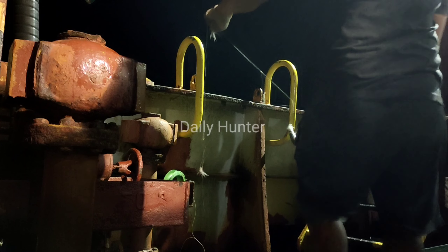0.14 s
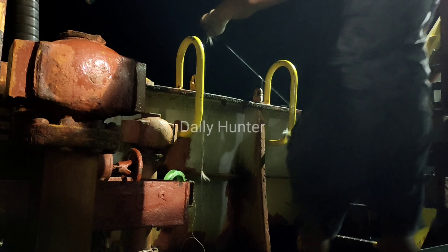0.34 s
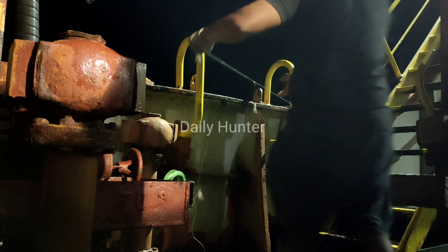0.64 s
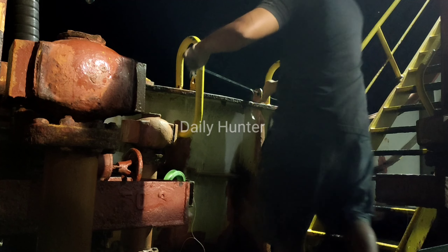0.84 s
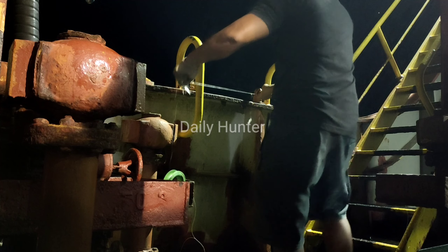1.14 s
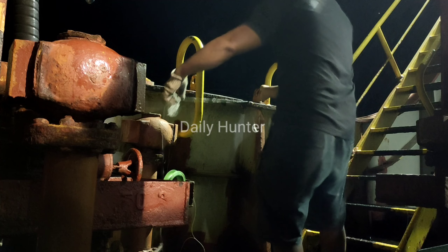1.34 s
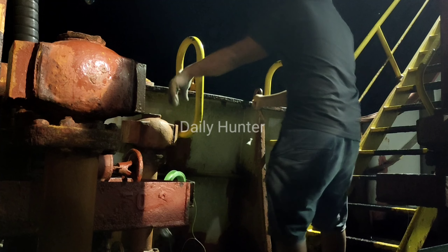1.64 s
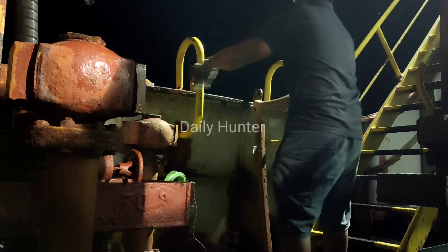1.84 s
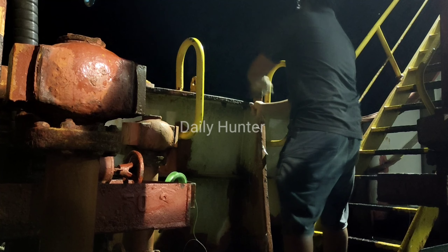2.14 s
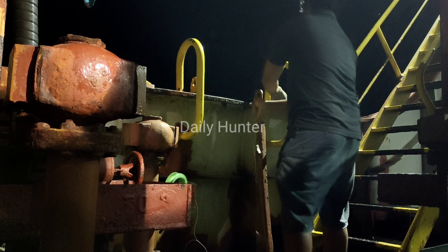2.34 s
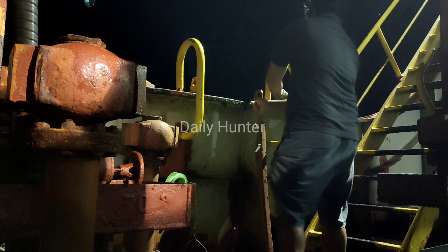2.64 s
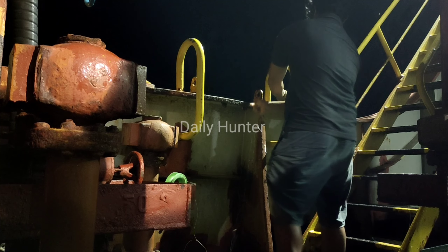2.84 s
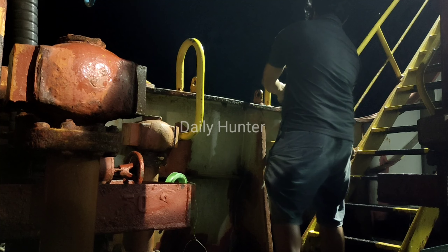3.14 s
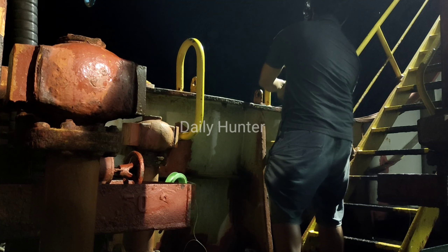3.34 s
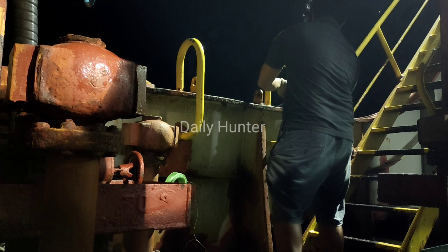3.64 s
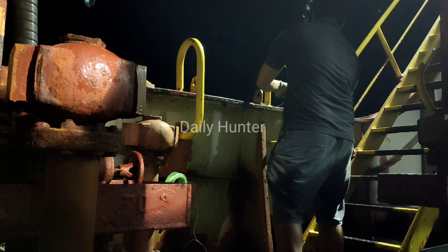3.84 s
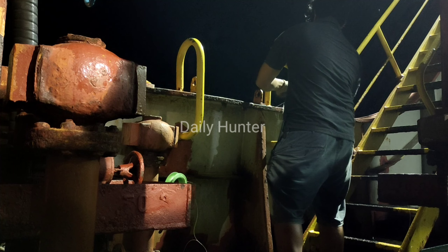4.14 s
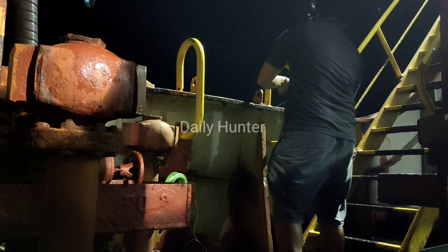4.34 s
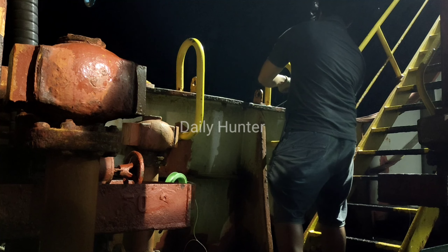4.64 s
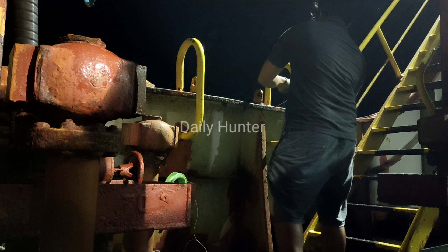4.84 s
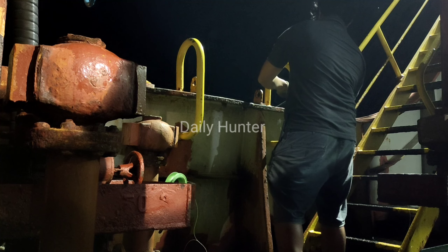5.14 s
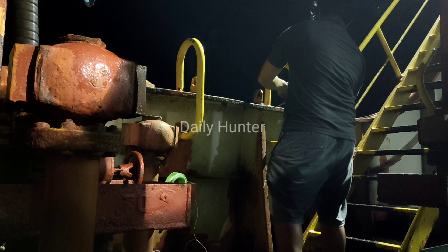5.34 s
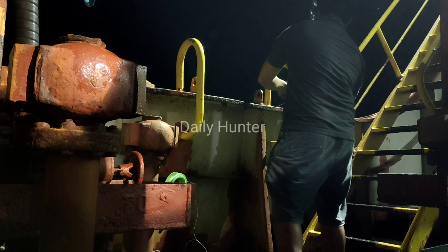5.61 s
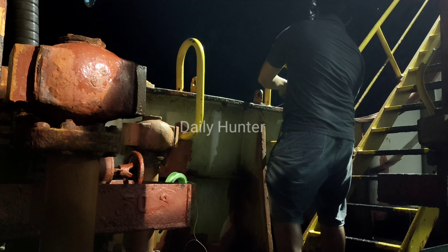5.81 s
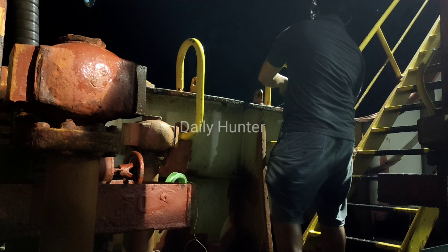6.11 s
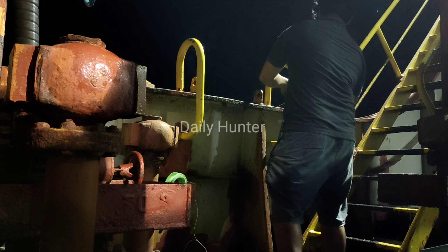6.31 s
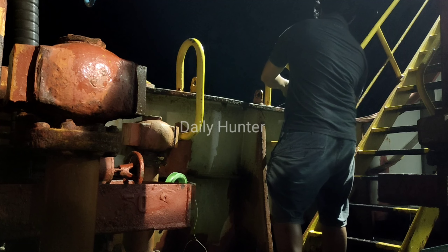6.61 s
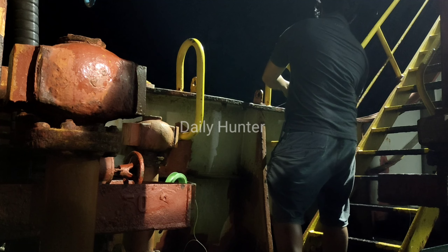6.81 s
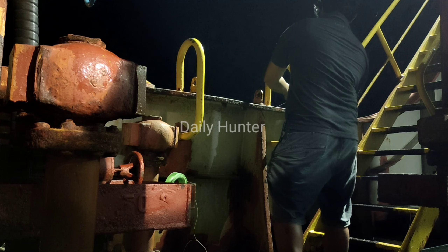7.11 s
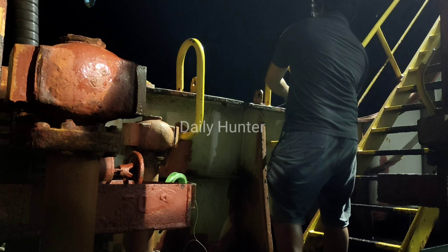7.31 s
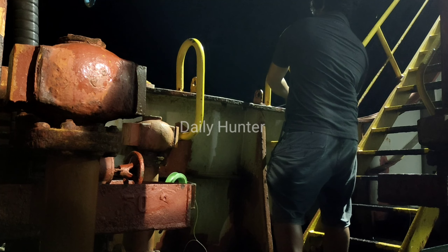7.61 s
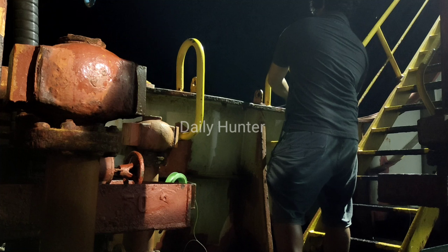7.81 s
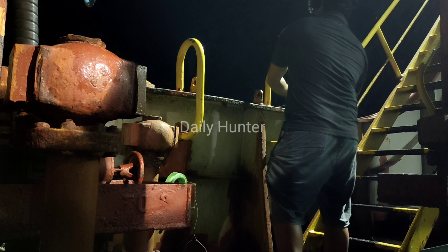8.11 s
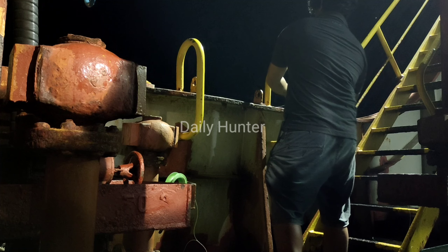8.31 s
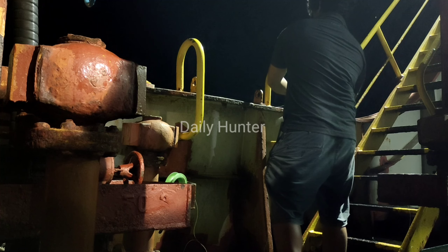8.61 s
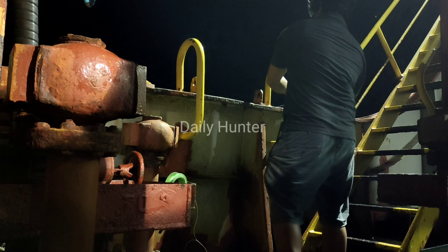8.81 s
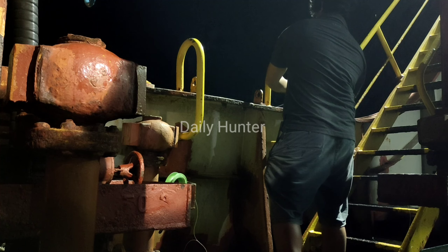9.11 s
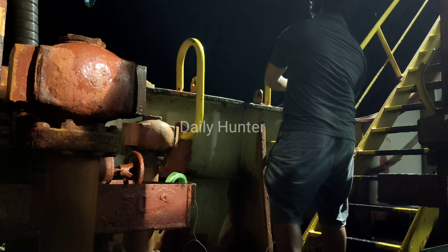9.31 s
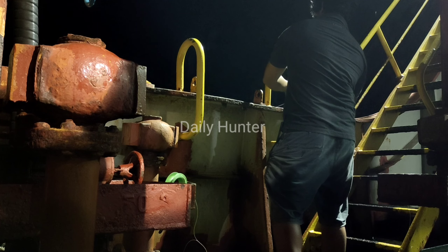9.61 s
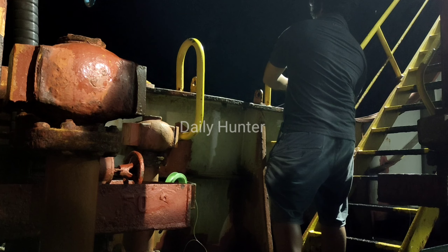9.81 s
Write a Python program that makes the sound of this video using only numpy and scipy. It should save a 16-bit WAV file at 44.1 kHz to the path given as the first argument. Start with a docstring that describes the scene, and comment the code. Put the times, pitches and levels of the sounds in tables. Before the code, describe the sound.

A loud, deep ship-engine hum throbs continuously, with resonant steelwork rumble, rushing exhaust and ventilation noise, and a very faint duct whistle.

```python
"""Two diesel exhausts drone on a ship's open steel deck at night: tones on multiples of two unrelated
crank speeds, beating against each other. The second engine's tone dips twice.
Beneath: noise ringing in steelwork and duct resonances, and a broad roar with a thin hiss on top, both
pulsing gently with the main engine. Drone and machinery start 2 dB low and settle.
A faint duct whistle, narrow-band noise, swells three times."""
import sys
import numpy as np
from scipy import signal
from scipy.fft import rfft, irfft, next_fast_len
from scipy.io import wavfile

SR = 44100
rng = np.random.default_rng(int(sys.argv[2]) if len(sys.argv) > 2 else 0)


def wav_out(sig):
    """Save sig, one row per channel (or a flat mono array), as 16-bit PCM at SR to the path in sys.argv[1]."""
    wavfile.write(sys.argv[1], SR, np.round(np.clip(np.atleast_2d(sig).T, -1, 1) * 32767).astype(np.int16))


N = 439236
TIME_S = np.arange(N) / SR

# exhaust tones of each engine: crank_multiple, level_db (re strongest tone)
MAIN_TONES = [(8, -37.5), (10, -41), (12, -23.5), (14, -8), (16, -12.5), (18, 0.0), (22, -34.5),
              (46, -42.5), (48, -40), (50, -42), (52, -45)]
SECOND_TONES = [(6, -22.5), (7, -23.5), (8, -16), (9, 0), (10, -20.5), (13, -13), (14, -20), (27, -32.5)]
# dips of the second engine's tone: centre_s, length_s, depth_db
SECOND_DIPS = [(1.701, 1.2, 3.5), (4.299, 1.1, 4.5)]
# resonances of plating and ducts: centre_hz, width_hz, peak_db_per_hz (before NOISE_DB)
STEELWORK_RESONANCES = [(186, 15, -49), (211.5, 28, -58), (302.1, 20, -59.5), (379, 7.4, -61.5),
                        (415, 25, -62), (653, 7, -64), (672.3, 55, -65), (723, 16, -68), (747, 85, -69),
                        (830, 20, -68), (866, 37, -65.5), (907, 25, -68.5), (953, 32, -67.5),
                        (1029.7, 35, -68), (1045, 10, -73), (1150, 78, -74.5), (1272, 95, -77),
                        (1578, 14, -82.5), (1900, 160, -85), (2520, 290, -88.5)]
# roar of exhaust gas and ventilation: freq_hz, level_db_per_hz (before NOISE_DB)
ROAR_SPECTRUM = [(25, -70.5), (38, -66.5), (60, -61.5), (105, -45), (145, -53.5), (175, -56.5),
                 (255, -63.5), (500, -66), (565, -71), (1450, -82.5), (2700, -88), (3500, -94.5),
                 (4900, -101.3), (7000, -116)]
# thin hiss on top: freq_hz, level_db_per_hz (before NOISE_DB)
HISS_SPECTRUM = [(3500, -115), (5700, -104.7), (7200, -102.7), (8400, -101.6), (9700, -104.5),
                 (12000, -105.7), (15500, -105.8)]
# swells of the duct whistle: centre_s, length_s, peak_db
WHISTLE_SWELLS = [(6.35, .3, -62.5), (7.05, 0.34, -60.5), (8.102, .6, -66.5)]

MAIN_TURNS_PER_S, SECOND_TURNS_PER_S = 6.27085, 9.203
MAIN_FIRES_S, SECOND_FIRES_S = 0.0404, 0.0653  # moment of a firing
MAIN_DB, SECOND_DB = -12, -24.5  # settled rms level of the strongest tone
STACK_HZ, STACK_WIDTH_HZ = 94, 4  # exhaust stack resonance
NOISE_DB = 0.5  # settled offset of roar and ringing
SETTLE_S, DRONE_RISE_DB, NOISE_RISE_DB = 3.6, 2, 2
WHISTLE_HZ, WHISTLE_WIDTH_HZ = 1580, 14
CUTOFF_HZ, EDGE_S = 15450, 0.002


def crank(turns_per_s, fires_s):
    """Crankshaft turns at constant speed, counted from a firing."""
    return turns_per_s * (TIME_S - fires_s)


def exhaust(turns, turns_per_s, tones):
    """Firing pulses leaving one stack: steady tones on multiples of the crank speed."""
    out = np.zeros(N)
    for multiple, level_db in tones:
        # tones well above the stack resonance lag half a cycle behind those well below
        offset_hz = multiple * turns_per_s - STACK_HZ
        lag_rad = np.arctan(offset_hz / (STACK_WIDTH_HZ / 2))
        tone = np.sqrt(2) * np.cos(2 * np.pi * multiple * turns - lag_rad)
        out += from_db(level_db) * tone
    return out


def drone(main_turns, second_turns):
    """Sum of both exhausts; their unrelated tones beat."""
    dip_db = sum(depth_db * bump(centre_s, length_s) for centre_s, length_s, depth_db in SECOND_DIPS)
    main = from_db(MAIN_DB) * exhaust(main_turns, MAIN_TURNS_PER_S, MAIN_TONES)
    second = from_db(SECOND_DB - dip_db) * exhaust(second_turns, SECOND_TURNS_PER_S, SECOND_TONES)
    return from_db(settling_db(DRONE_RISE_DB)) * (main + second)


def chug(turns, cycle_db, turn_db, firing_db):
    """Gain following the four-stroke cycle (two turns), each turn and the four firings in a turn."""
    angle_rad = 2 * np.pi * turns
    cycle = cycle_db * np.cos(angle_rad / 2)
    turn = turn_db * np.cos(angle_rad)
    firing = firing_db * np.cos(4 * angle_rad)
    return from_db(cycle + turn + firing)


def steelwork():
    """Ceaseless vibration keeps every resonance of plating and ducts ringing."""
    def gain_at(hz):
        power = 0
        for centre_hz, width_hz, peak_db in STEELWORK_RESONANCES:
            power = power + (from_db(peak_db) * resonance(hz, centre_hz, width_hz)) ** 2
        return np.sqrt(power)
    return noise(gain_at)


def roar():
    """Turbulent flow: noise heavy in the bass, fading into hiss."""
    def spectrum_gain(hz, points):
        points_hz, points_db = np.transpose(points)
        return from_db(np.interp(np.log(hz), np.log(points_hz), points_db))
    return noise(lambda hz: np.hypot(spectrum_gain(hz, ROAR_SPECTRUM), spectrum_gain(hz, HISS_SPECTRUM)))


def machinery(main_turns):
    """Roar and ringing, both pulsing with the main engine."""
    flow = roar() * chug(main_turns, cycle_db=0.16, turn_db=0.13, firing_db=0.25)
    ringing = steelwork() * chug(main_turns, cycle_db=0.26, turn_db=0.13, firing_db=0.25)
    return from_db(NOISE_DB + settling_db(NOISE_RISE_DB)) * (flow + ringing)


def whistle():
    """Air sings unsteadily in a narrow duct resonance, in soft swells."""
    gain = sum(from_db(peak_db) * bump(centre_s, length_s)
               for centre_s, length_s, peak_db in WHISTLE_SWELLS)
    return gain * rms_one(noise(lambda hz: resonance(hz, WHISTLE_HZ, WHISTLE_WIDTH_HZ)))


def from_db(db):
    """Decibels to gain."""
    return 10 ** (np.asarray(db) / 20)


def settling_db(rise_db):
    """Level that starts rise_db low and creeps exponentially towards 0 dB."""
    return -rise_db * np.exp(-TIME_S / SETTLE_S)


def bump(centre_s, length_s):
    """Smooth rise and fall of height 1, above half height for length_s."""
    return 0.5 ** ((2 * (TIME_S - centre_s) / length_s) ** 2)


def resonance(hz, centre_hz, width_hz):
    """Gain of a resonance passed twice: 1 on top, width at half gain."""
    return 1 / (1 + ((hz ** 2 - centre_hz ** 2) / (hz * width_hz)) ** 2)


def noise(gain_at):
    """Gaussian noise whose amplitude per root Hz is gain_at(hz)."""
    size = next_fast_len(N, True)
    hz = np.maximum(np.arange(size // 2 + 1) * SR / size, 0.01)  # keeps 0 Hz out of log and division
    spectrum = rfft(rng.standard_normal(size)) * gain_at(hz)
    return irfft(spectrum, size)[:N] * np.sqrt(SR / 2)


def rms_one(x):
    """Scale to rms 1."""
    return x / np.sqrt(np.mean(x ** 2) + 1e-20)


def scene():
    """Beating drone over pulsing machinery noise and a faint whistle."""
    main_turns = crank(MAIN_TURNS_PER_S, MAIN_FIRES_S)
    second_turns = crank(SECOND_TURNS_PER_S, SECOND_FIRES_S)
    return (drone(main_turns, second_turns) + machinery(main_turns) + whistle())[None]


def record(dry):
    """Soften both ends over EDGE_S and cut steeply above CUTOFF_HZ."""
    from_end_s = np.minimum(TIME_S, TIME_S[::-1])
    edges = np.sin(np.pi / 2 * np.minimum(from_end_s / EDGE_S, 1)) ** 2
    lowpass = signal.ellip(12, 0.1, 90, CUTOFF_HZ, fs=SR, output="sos")
    return signal.sosfilt(lowpass, dry * edges)


dry = scene()
out = record(dry)
wav_out(out)
```